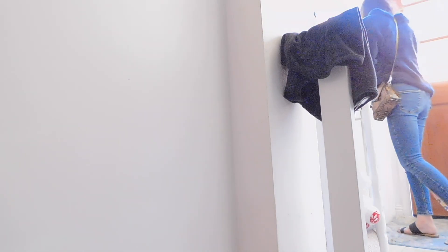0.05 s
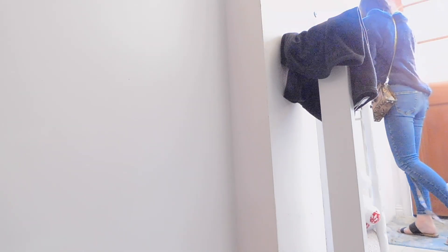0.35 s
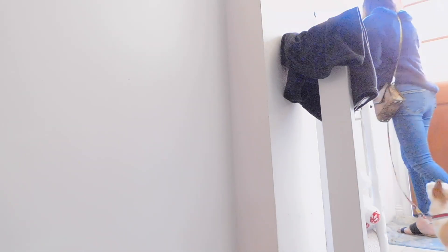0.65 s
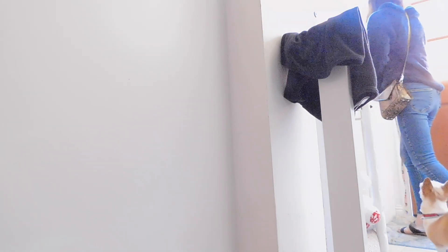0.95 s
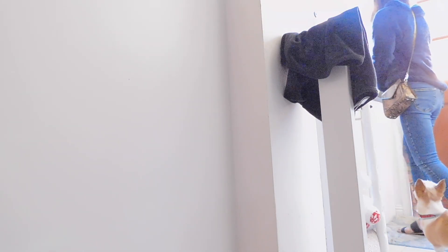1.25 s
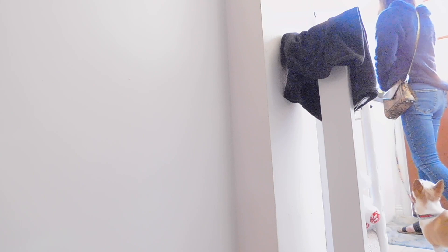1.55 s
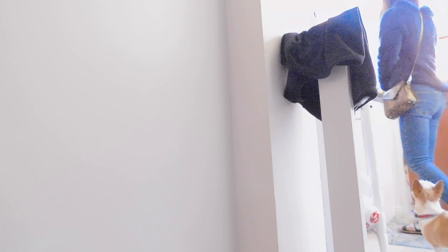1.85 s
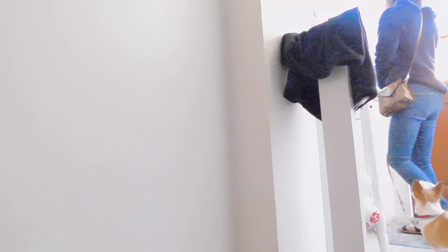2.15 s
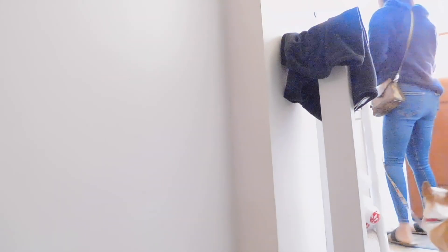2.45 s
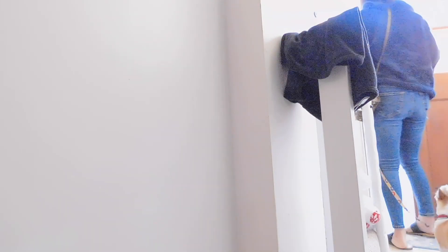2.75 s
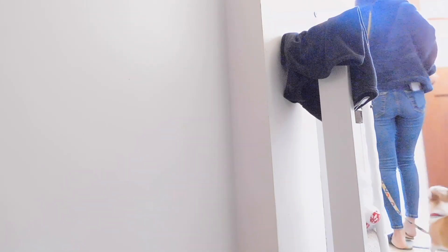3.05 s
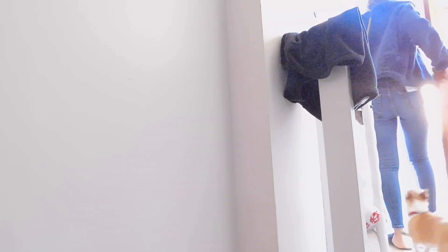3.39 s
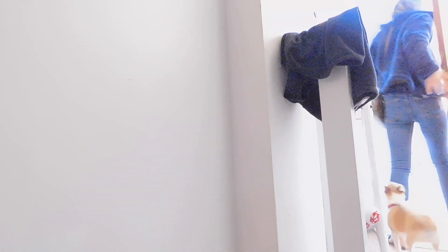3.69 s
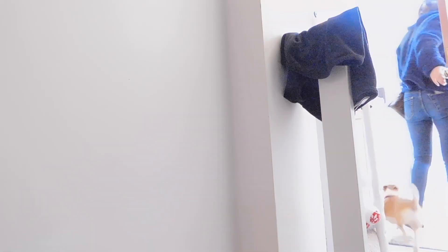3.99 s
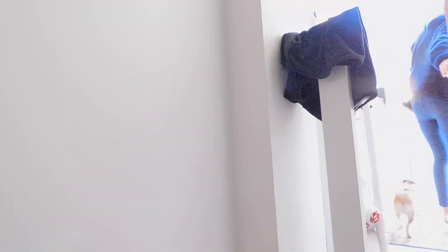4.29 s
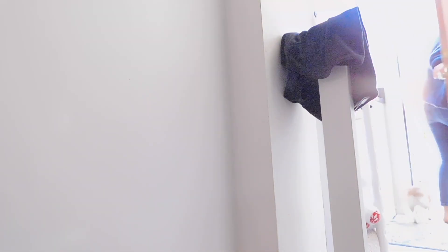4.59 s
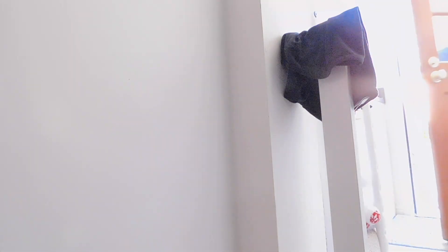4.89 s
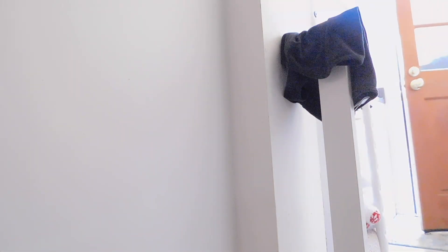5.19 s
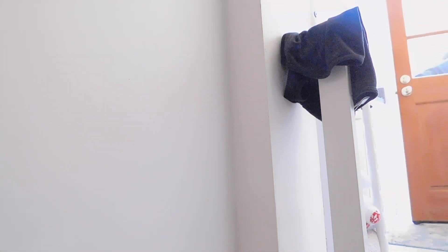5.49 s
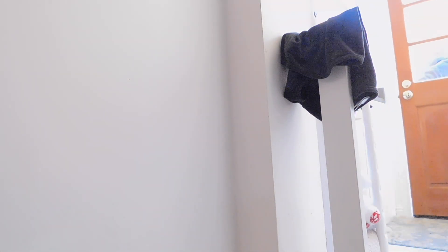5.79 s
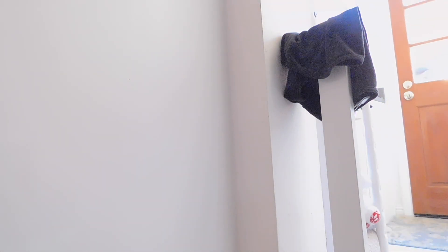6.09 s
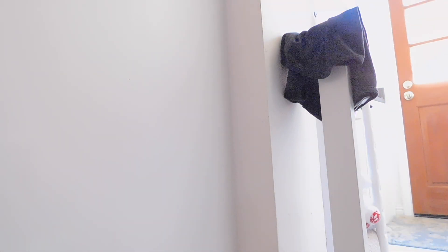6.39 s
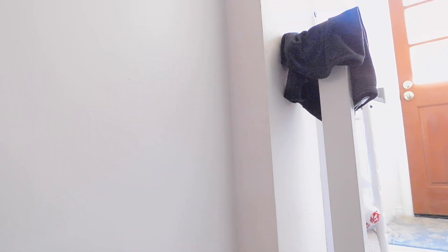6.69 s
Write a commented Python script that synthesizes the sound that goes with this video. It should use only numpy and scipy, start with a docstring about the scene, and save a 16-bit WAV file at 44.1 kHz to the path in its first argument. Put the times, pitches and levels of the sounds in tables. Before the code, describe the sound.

In a quiet, slightly echoing hallway, soft sandal steps, rustling clothes and the clink of dog tags come from a little to the right. After a few latch clicks, a wooden door creaks open, falling from a thin squeal to a rough rasp, with several louder knocks. Bright tag jingles follow, the hinges squeal upward as the door returns, and it bangs into its frame, leaving a few faint knocks and clinks.

```python
"""A wooden door squeals on dry hinges as someone in sandals takes a small dog out, heard down a hallway.
Collar tags jingle in clusters of close modes, steps knock on the floor and the latch clicks.
The hinge pins stick and slip: fast slips sing, slow ones rasp, so the squeal sinks to a rasp as the
door opens. It swings back with a rising squeal and bangs into its frame, setting the floor booming.
Hard walls echo the door, steps and tags; clothes rustle over still room air."""
import sys
import numpy as np
from scipy import signal
from scipy.fft import rfft, irfft, next_fast_len
from scipy.io import wavfile
from scipy.ndimage import uniform_filter1d, map_coordinates

SR = 44100
rng = np.random.default_rng(int(sys.argv[2]) if len(sys.argv) > 2 else 0)


def to_wav(s):
    """Save 16-bit WAV."""
    ch = np.atleast_2d(s).T  # columns
    pcm = np.round(np.clip(ch, -1, 1) * 32767)  # PCM
    wavfile.write(sys.argv[1], SR, pcm.astype(np.int16))


N = 306054


def amp(db):
    """Decibels to gain."""
    return 10 ** (np.asarray(db) / 20)


def unit(x):
    """Scale to rms 1."""
    return x / np.sqrt(np.mean(x ** 2) + 1e-20)


def along(points, hz):
    """Read (Hz, value) points on a log axis."""
    f, v = np.transpose(points)
    return np.interp(np.log(hz + 1), np.log(f), v)


def curves(rows):
    """One value per sample for each column after the time."""
    s, *cols = np.transpose(rows)
    return [np.interp(np.arange(N) / SR, s, c) for c in cols]


def during(rows):
    """A soft-edged gate, open from the first row's time to the last."""
    t = np.arange(N) / SR
    return uniform_filter1d(1. * ((t >= rows[0][0]) & (t <= rows[-1][0])), size=200)


def wobble(rate):
    """A smooth random curve, rate knots a second."""
    return map_coordinates(rng.standard_normal(int(N * rate / SR) + 4), [np.arange(N) * rate / SR])


def filtered(x, response):
    """Equalise x with a gain given as a function of Hz."""
    n = x.shape[-1]
    m = next_fast_len(n + 8192)
    return irfft(rfft(x, m) * response(np.fft.rfftfreq(m, 1 / SR)), m)[..., :n]


def below(hz, edge_hz):
    """A steep low-pass gain."""
    return 1 / (1 + (hz / edge_hz) ** 8)


def steady(x):
    """Even out slow swells to rms 1 and keep the fast flutter."""
    power = np.abs(uniform_filter1d(uniform_filter1d(np.mean(x ** 2, 0), size=2600), size=1800))
    return x / np.sqrt(power + power.max() / 10 ** 4)


def add(track, s, sound):
    """Mix a sound in at s seconds."""
    part = track[..., max(round(s * SR), 0):][..., :sound.shape[-1]]
    part += sound[..., :part.shape[-1]]


def diffuse(count):
    """Stereo noise arriving from all sides: alike in the bass, unrelated in the treble."""
    # Stereo image. Each row: frequency in Hz, left-right correlation.
    likeness = [(280, 0.97), (500, 0.82), (1000, 0.67), (2000, 0.24), (5000, -0.11)]
    angle = lambda hz: np.arccos(np.clip(along(likeness, hz), -1, 1)) / 2
    noise = rng.standard_normal((2, count))
    mid, side = filtered(noise, lambda hz: np.array([np.cos(angle(hz)), np.sin(angle(hz))]))
    return np.array([mid + side, mid - side])


def hall(x, direct_db, early_db=4, early_t60=0.27):
    """Direct sound, then dense echoes from near walls and the hallway's tail."""
    # The tail's decay. Each row: frequency in Hz, seconds to fall 60 dB.
    tail_t60 = [(60, 0.85), (250, 0.22), (600, 0.6), (1500, 0.5), (3500, 0.28), (7000, 0.24),
                (14000, 0.083)]
    hz, t, spectrum = signal.stft(diffuse(SR * 3 // 4), SR, nperseg=256)
    fade = amp(-60 * t / along(tail_t60, hz)[:, None]) + amp(early_db - 60 * t / early_t60)
    echo = signal.istft(spectrum * fade, SR, nperseg=256)[1]
    echo /= np.linalg.norm(echo[0])
    echo[[0, 1], [4, 0]] += amp(direct_db)  # reaches the right side 4 samples early
    return signal.fftconvolve(x[None], echo / np.linalg.norm(echo[0]), axes=1)[:, :N]


def blow(response, t60, rise_s):
    """An impact: a burst of dense ringing that builds quickly and falls 60 dB in t60 seconds."""
    t = np.arange(SR // 3) / SR
    ringing = unit(filtered(rng.standard_normal(len(t)), response))
    return ringing * amp(-60 * t / t60) * (1 - np.exp(-t / rise_s))


def air_and_rustle(air_db=-62.5, rustle_db=-2):
    """Still room air, and the uneven rustle of clothes and shuffling feet."""
    # Tone of the air and of the rustle. Each row: frequency in Hz, relative level in dB.
    air_tone = [(12, -40), (20, 0.5), (53, -1), (76, -34), (123, -13.5), (386, -19.5), (637, -15.5),
                (1150, -17), (1740, -13), (2720, -24), (15800, -36)]
    rustle_tone = [(40, -23), (80, -0.5), (230, -6), (1900, -9), (4000, -16), (11000, -23.5), (15800, -28)]
    # How much the walker stirs. Each row: time in seconds, level in dB.
    movement = [(0, -57.5), (.7, -54), (1.05, -68.5), (1.8, -64), (2.15, -55), (4.3, -49.5), (5.2, -60.5),
                (5.75, -54.5), (6.55, -61), (6.94, -70)]
    air = unit(filtered(diffuse(N), lambda hz: amp(along(air_tone, hz))))
    rustle = unit(filtered(diffuse(N), lambda hz: amp(along(rustle_tone, hz))))
    uneven_db = 2.5 * wobble(22)
    return amp(air_db) * air + rustle * amp(curves(movement)[0] + rustle_db + uneven_db)


def soft_clinks(stride_s=.2, spread_db=5, large_db=-16.5, large_spread_db=7.5):
    """The trotting dog shakes out about one clink a stride, uneven in time and strength."""
    # Spells of trotting. Each row: start and end in seconds, mean clink level in dB.
    trots = [(0.661, 0.8, -44), (3.8, 5.15, -37.5), (5.279, 5.8, -46), (6.36, 6.7, -51.5)]
    return [(s + stride_s * rng.random() / 2,
             rng.normal(db, spread_db),
             rng.normal(large_db, large_spread_db))
            for start, end, db in trots for s in np.arange(start, end, stride_s)]


def collar_tags(low_db=1, high_db=-7, tick_db=-3, width_hz=110, ring_t60=0.087, bounce_s=0.022):
    """The tags clink and bounce once; each contact rings clusters of close modes at new strengths."""
    # The main clinks. Each row: start in seconds, level in dB, the large tag's offset in dB.
    jingles = [(0.0844, -43.5, -14), (0.3293, -37, -6.5), (0.3965, -34, -22), (0.4244, -37, -7),
               (0.5217, -38.5, -8.5), (0.5866, -28.5, -21), (0.9153, -55.5, 1.5), (4.0694, -29, -15),
               (4.4179, -28.5, -16), (4.9262, -24, -17), (4.9786, -27.5, -23)]
    # Modes of the large tag, then of the small tag and ring. Each row: centre in Hz, level in dB.
    large_modes = [(6480, 0)]
    small_modes = [(10660, 0), (12490, -6), (13300, -7), (13850, -2), (14600, -8)]

    def ring(modes):
        """Where the tags touch decides which modes of each cluster speak."""
        struck = np.array(modes) + rng.standard_normal((len(modes), 2)) * [90, 5]  # spread in Hz, dB
        peaks = lambda hz: sum(amp(db) / (1 + ((hz - centre) / width_hz) ** 2) for centre, db in struck)
        return blow(peaks, ring_t60, rise_s=0.00023)

    out = np.zeros(N)
    for s, db, large_db in jingles + soft_clinks():
        for bounce in range(2):
            tick = amp(tick_db) * blow(lambda hz: 1 - below(hz, 4300), t60=0.11, rise_s=.0003)
            large, small = ring(large_modes), ring(small_modes)
            clink = amp(large_db + low_db) * large + amp(high_db) * (small + tick)
            add(out, s + bounce * bounce_s * rng.uniform(1, 2), amp(db - 6 * bounce) * clink)
    return hall(out, direct_db=-4.5)


def knocks(trim_db=-3, t60=0.099):
    """Sandal steps, the latch and bumps of the door, each with its own mix of thud, wood and click."""
    # Hits on floor and door. Each row: start in seconds, level in dB, thud and click offsets in dB.
    hits = [(0.2686, -43, -11, 0.5), (0.442, -36, 4.5, -15), (0.6113, -34, 8, -8),
            (0.6244, -40.5, 12.5, -8), (1.5129, -34, -5, -8), (1.9121, -34, 7.5, -11),
            (1.9263, -29.5, 1, -5), (2.0237, -38, -8, -3), (2.1159, -35.5, -5.5, -15),
            (2.5851, -37.5, 0, -14), (2.6299, -38.5, -3, -10), (3.2088, -21, -13, -21),
            (3.6526, -15.5, -14.5, -10.5), (3.8815, -20, -14.5, -10), (4.631, -32.5, -3.5, -25),
            (5.729, -31, -5.5, -22), (6.1163, -40.5, -12, -14), (6.269, -35.5, -8.5, -7),
            (6.4, -43.5, -4, -30)]
    # Tone of struck wood. Each row: frequency in Hz, relative level in dB.
    wood_tone = [(25, -38), (68, -19), (120, -18), (170, -3), (240, -7), (420, 0), (750, -5.5),
                 (1300, -13.5), (2400, -20), (4100, -17.5), (5500, -25.5), (9000, -32.5), (15000, -44)]
    bands = [lambda hz: below(hz, 1170),  # thud
             lambda hz: below(hz, 3200) - below(hz, 984),  # wooden knock
             lambda hz: 1 - below(hz, 2250)]  # click
    out = np.zeros((2, N))
    for s, db, thud_db, click_db in hits:
        thud, wood, click = (blow(lambda hz: band(hz) * amp(along(wood_tone, hz)), t60, rise_s=0.0006)
                             for band in bands)
        hit = amp(db + trim_db) * (amp(thud_db) * thud + wood + amp(click_db) * click)
        add(out, s, hall(hit, direct_db=-3))
    return out


def floor_boom(boom_hz=68, t60=0.98, rise_s=0.0073):
    """The floor's lowest mode swells and rings on, alike on both sides."""
    # Heavy blows that set the floor ringing. Each row: start in seconds, level in dB.
    booms = [(0.62, -49.5), (5.86, -44)]
    out, t = np.zeros(N), np.arange(SR) / SR
    for s, db in booms:
        envelope = amp(db - 60 * t / t60) * (1 - np.exp(-t / rise_s))
        add(out, s, envelope * np.sin(2 * np.pi * boom_hz * t))
    return out


def slips(rate, rough, waver, scatter_db=-0.44):
    """Stick-slip: one sharp pulse per slip, each wait scattered by rough, a share of the period."""
    rate = rate * np.exp(waver * rough * wobble(45))  # a rough pin also wanders in pitch
    cycles = np.cumsum(rate) / SR
    timing, strength = rng.standard_normal((int(cycles[-1]), 2)).T
    regular = np.arange(len(timing)) + .5
    due = regular + np.cumsum(timing * np.interp(regular, cycles, rough))
    at = np.interp(due, cycles, np.arange(N))
    inside = (due > 0) * (due < cycles[-1])
    size = amp(scatter_db * strength) / np.sqrt(np.interp(due, cycles, rate)) * inside
    taps = at.astype(int)[:, None] + np.arange(-7, 9)
    offset = taps - at[:, None]
    pulses = size[:, None] * np.sinc(offset) * np.cos(np.pi * offset / 16) ** 2  # land between samples
    return np.bincount(taps.clip(0, N - 1).ravel(), pulses.ravel(), N)


def hinge(rate, rough, waver, jolt_hz=700, catch_db=1.0):
    """Fast slips make the hinge sing; slow ones are uneven jolts that shake the whole leaf."""
    # Tone of the squeal and of the rasp. Each row: frequency in Hz, gain in dB.
    squeal_tone = [(500, -43), (900, -7.5), (1300, -15.5), (1750, -1.5), (2100, -7.5), (2800, -5),
                   (3700, -4.5), (4400, -9.5), (5500, -7.5), (8200, -13.5), (10500, -23), (15000, -33.5)]
    rasp_tone = [(50, -26), (150, 2), (300, -5), (480, -7), (720, -10.5), (1050, 3.5), (1500, -1.5),
                 (2700, 0), (4000, -10.5), (5500, -14.5), (10000, -17), (15500, -29)]
    pulses = slips(rate, rough, waver)
    slow = below(rate, jolt_hz)
    jolts = pulses * slow * amp(catch_db * wobble(170))  # the pin catches now harder, now softer
    squeal = filtered(pulses * (1 - slow), lambda hz: amp(along(squeal_tone, hz)))
    rasp = filtered(jolts, lambda hz: amp(along(rasp_tone, hz)))
    return squeal + rasp


def second_hinge(attack_s=0.017, fade_db=8, release_s=0.018, tilt_db=-11):
    """The second hinge joins in with short squeaks at a pitch of their own, with softer overtones."""
    # Squeaks. Each row: start and length in seconds, first and last slips per second, level in dB,
    # timing scatter as a share of the period.
    squeaks = [(2.222, 0.036, 2380, 2500, -46, .006), (2.26, .07, 3640, 3700, -46, .006),
               (3.345, .16, 1830, 1390, -30, 0.033), (4.544, 0.089, 1400, 1560, -42, .07),
               (4.85, .14, 2400, 2350, -33.5, .03), (4.999, .16, 2400, 2950, -35.5, 0.034),
               (5.481, 0.039, 3400, 3500, -43.5, 0.0082)]
    t, rows = np.arange(N) / SR, np.array(squeaks)
    current = np.searchsorted(rows[1:, 0], t)
    start, length, first_hz, last_hz, db, rough = rows[current].T
    age = np.maximum(t - start, 0)
    progress = np.minimum(age / length, 1)
    sound = hinge(first_hz + (last_hz - first_hz) * progress, rough, waver=.6)
    envelope = np.minimum(age / attack_s, 1) * np.exp(-np.maximum(age - length, 0) / release_s)
    out = steady(sound[None])[0] * envelope * amp(db - fade_db * progress)
    mellow = filtered(out, lambda hz: amp(tilt_db * (0.5 - below(hz, 2830))))
    return hall(mellow, direct_db=1)


def pin_roughness(rate, clean=0.00247, rasp=.28, rasp_hz=580.6, glide_s=.006):
    """Timing scatter of the slips: a fast, steady pin sings cleanly, a slow or gliding one rasps."""
    glide = uniform_filter1d(np.abs(np.gradient(np.log(rate))) * SR, size=900)
    return clean + rasp / (1 + (rate / rasp_hz) ** 4.2) + glide_s * glide


def swing(motion, level, leaf_db, plate_db, direct_db, waver):
    """Slips of the hinge pin sound low through the door leaf and bright through the hinge plate."""
    rate, = curves(motion)
    sound = hall(hinge(rate, pin_roughness(rate), waver), direct_db)
    lows = filtered(sound, lambda hz: below(hz, 3700))
    leaf_level, plate_level = curves(level)
    leaf = amp(leaf_level + leaf_db) * steady(lows)
    plate = amp(plate_level + plate_db) * steady(sound - lows)
    return during(level) * (leaf + plate)


def door_swings():
    """The squeal sinks to a rasp as the door opens, then climbs as it swings back."""
    # Pitch of each swing. Each row: time in seconds, slips per second.
    opening_rate = [(2.3, 2310), (2.44, 2790), (2.57, 2910), (2.75, 2760), (2.81, 1950), (2.86, 1800),
                    (2.875, 1490), (2.95, 1584), (3.02, 1385), (3.12, 1310), (3.14, 1230), (3.26, 1285),
                    (3.35, 1207), (3.46, 960), (3.64, 646), (4.22, 491), (4.45, 194)]
    closing_rate = [(4.545, 1470), (4.59, 2070), (4.64, 2480), (4.8, 2520), (4.92, 2770), (4.97, 2980),
                    (5.1, 3020), (5.3, 3530)]
    # Loudness of each swing. Each row: time in seconds, leaf level in dB, plate level in dB.
    opening_level = [(2.29, -53, -67), (2.415, -51, -57), (2.44, -44, -53.5), (2.6, -44.5, -41.5),
                     (2.7, -40.5, -47), (3.3, -38.5, -45.5), (3.95, -33, -44), (4.378, -36, -46),
                     (4.53, -66, -60)]
    closing_level = [(4.545, -35, -45.5), (4.66, -30.5, -38), (4.82, -27.5, -37), (4.94, -28.5, -43.5),
                     (5.06, -45.5, -56), (5.18, -48.5, -46), (5.31, -61.5, -64.5)]
    opening = swing(opening_rate, opening_level, leaf_db=2, plate_db=3, direct_db=-4.5, waver=.7)
    closing = swing(closing_rate, closing_level, leaf_db=1.5, plate_db=-2, direct_db=-2, waver=0.447)
    return opening + closing


def slam():
    """The leaf strikes the frame and the latch snaps home."""
    # Hits on frame and strike plate. Each row: start in seconds, level in dB, seconds to fall 60 dB.
    hits = [(5.856, -10, 0.038), (5.863, -16, 0.035), (5.881, -17, 0.08)]
    # Tone of the struck frame. Each row: frequency in Hz, relative level in dB.
    frame_tone = [(25, -29), (70, -19), (120, -22), (185, -12.5), (245, -6), (310, -19), (400, -1.5),
                  (750, -24.5), (1100, -6), (1700, -7), (2700, -6.5), (3800, -15.5), (9000, -25.5),
                  (15800, -27)]
    out = np.zeros((2, N))
    for s, db, t60 in hits:
        bang = blow(lambda hz: amp(along(frame_tone, hz)), t60, rise_s=0.00027)
        add(out, s, hall(amp(db) * bang, direct_db=-4))
    return out


def scene():
    """Everything happens at the door, to the listener's right."""
    # Stereo balance. Each row: frequency in Hz, dB by which the right side is louder.
    right_lead = [(500, 0), (1000, 0), (2000, 1.5), (12000, 3)]
    mix = door_swings() + second_hinge() + knocks() + slam() + floor_boom()
    mix += collar_tags() + air_and_rustle()
    return filtered(mix, lambda hz: amp(np.outer([-.5, .5], along(right_lead, hz))))


def record(dry, top_hz=15850):
    """A brick-wall low-pass takes off the very top."""
    return filtered(dry, lambda hz: hz < top_hz)


dry = scene()
out = record(dry)
to_wav(out)
```